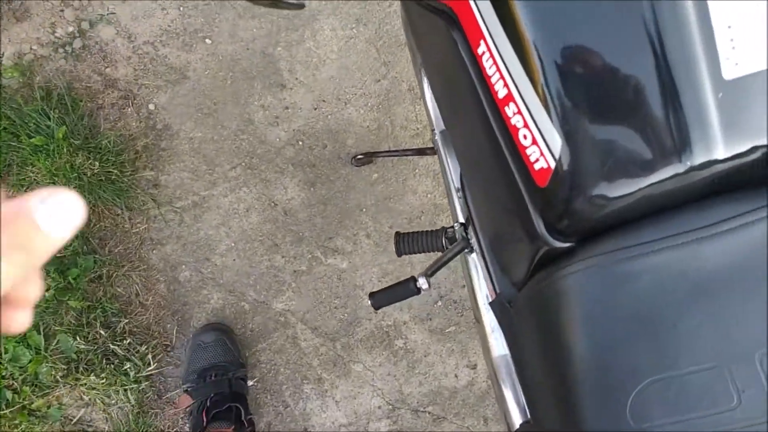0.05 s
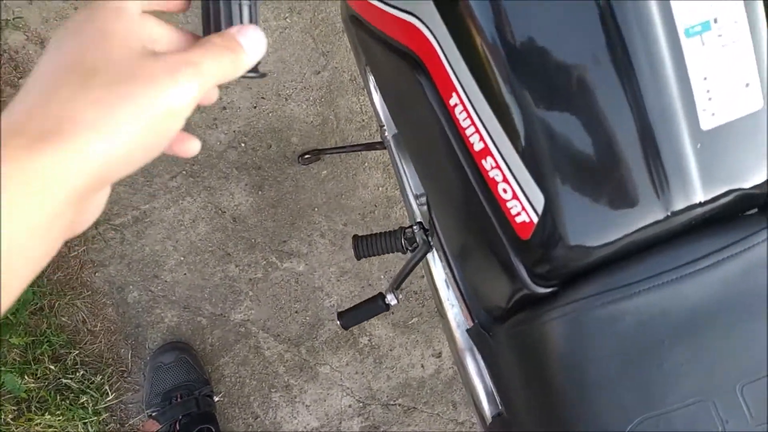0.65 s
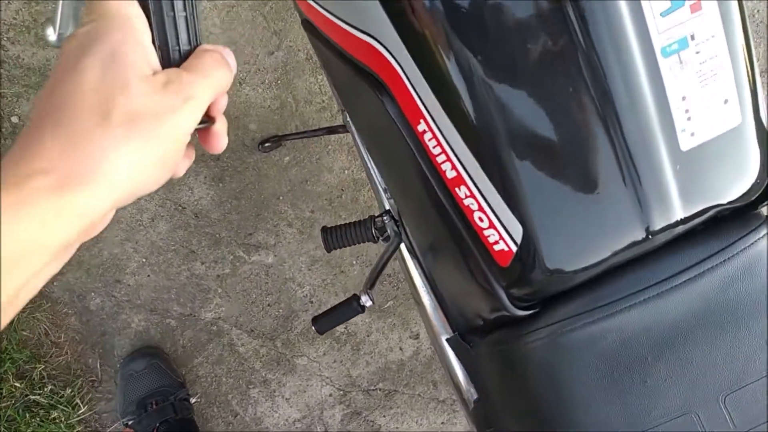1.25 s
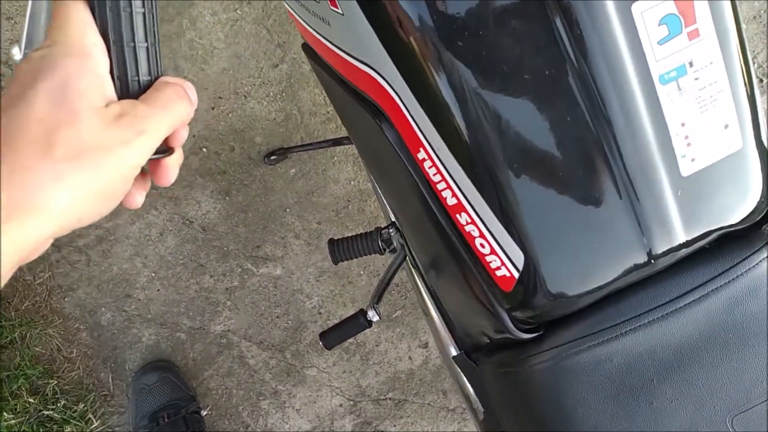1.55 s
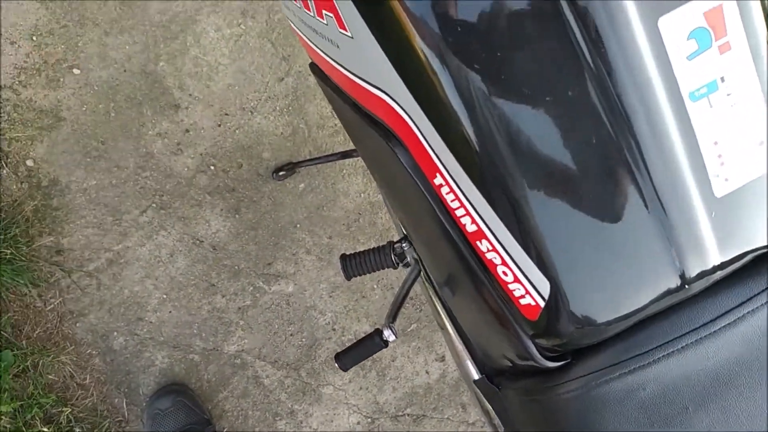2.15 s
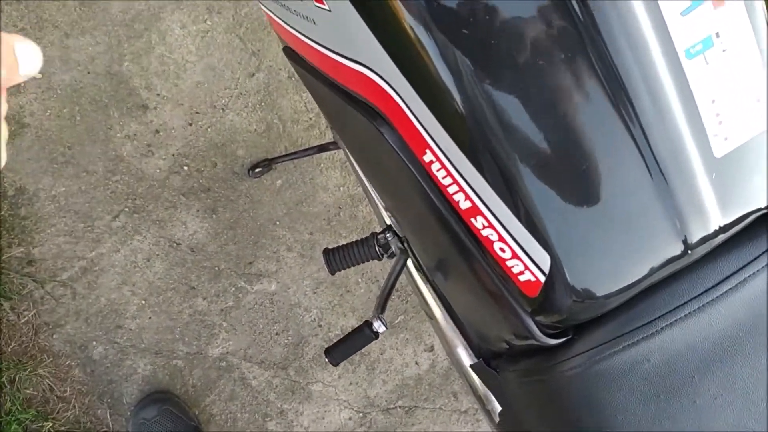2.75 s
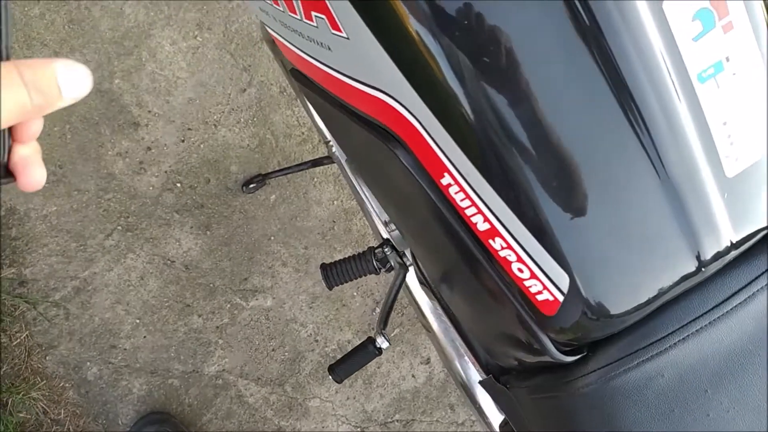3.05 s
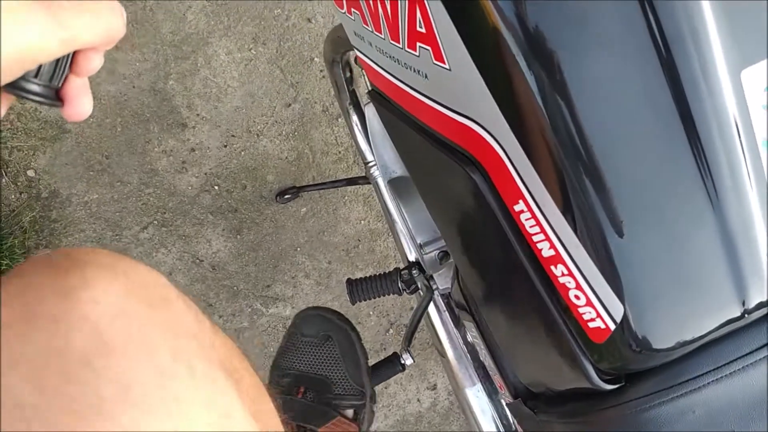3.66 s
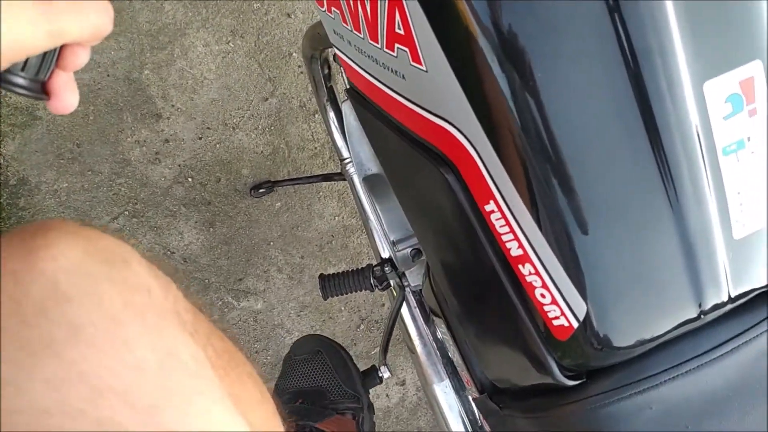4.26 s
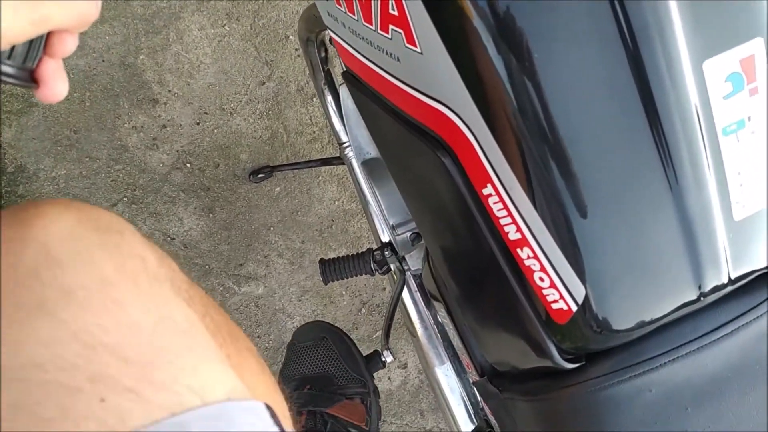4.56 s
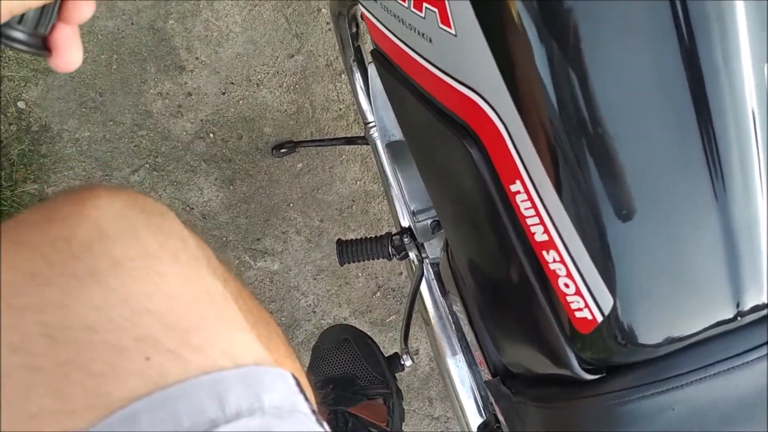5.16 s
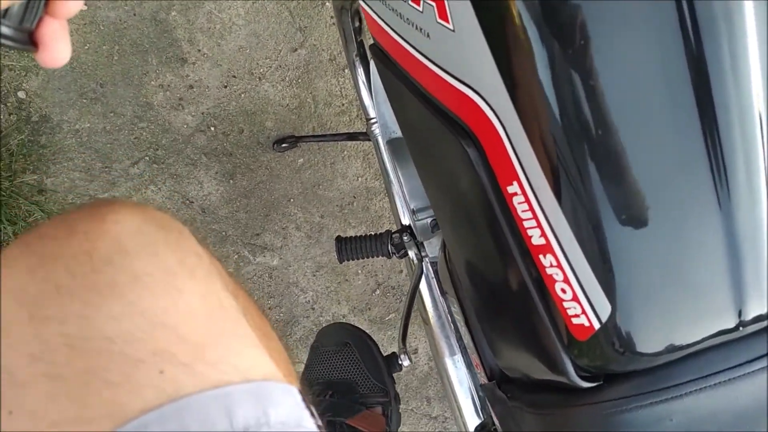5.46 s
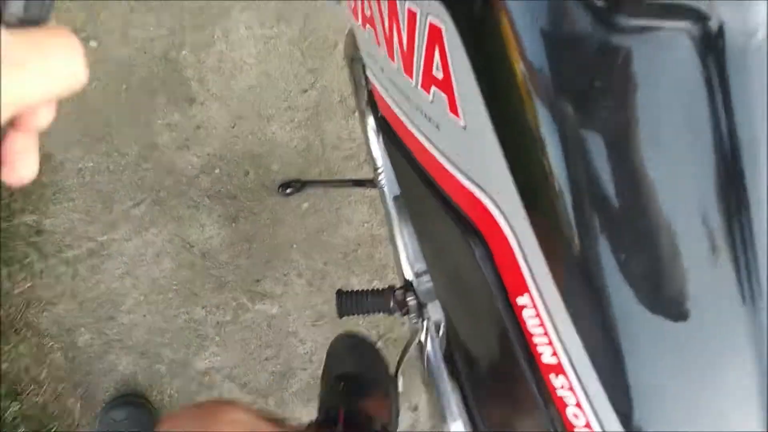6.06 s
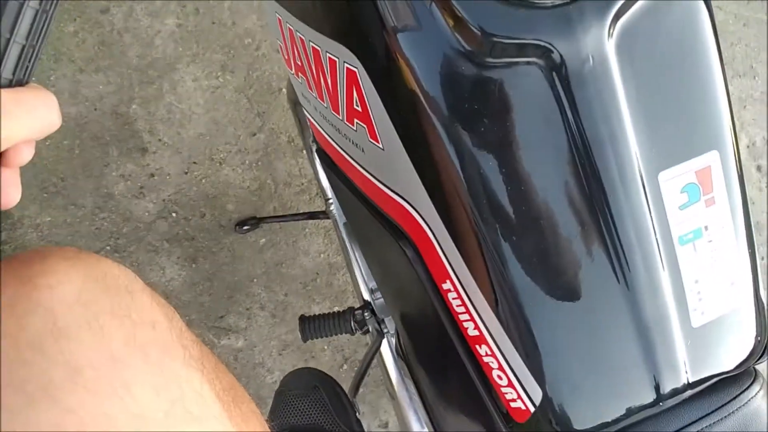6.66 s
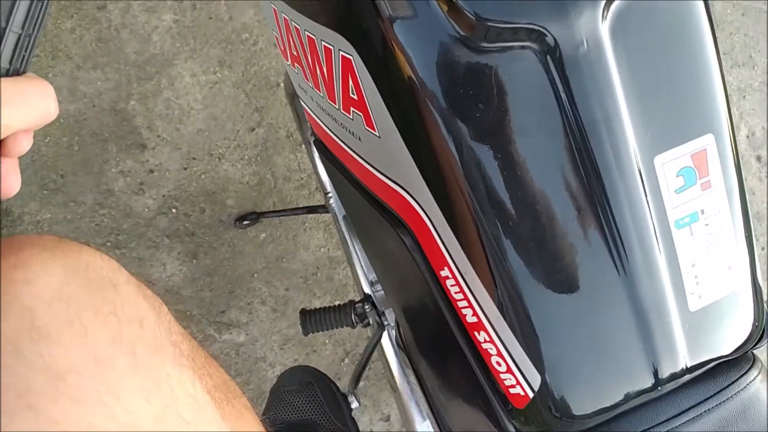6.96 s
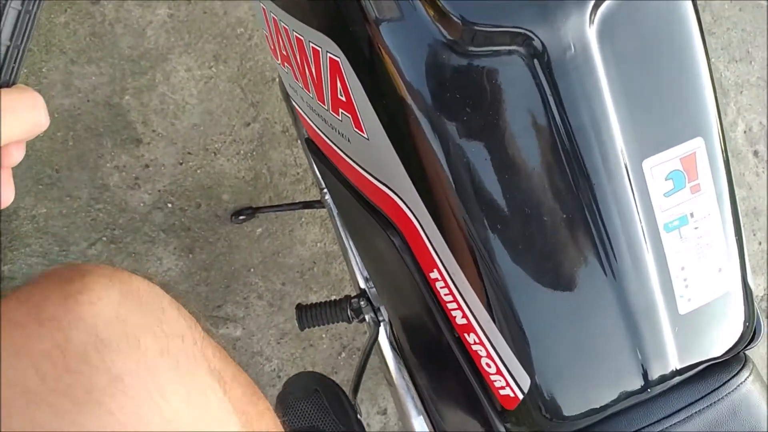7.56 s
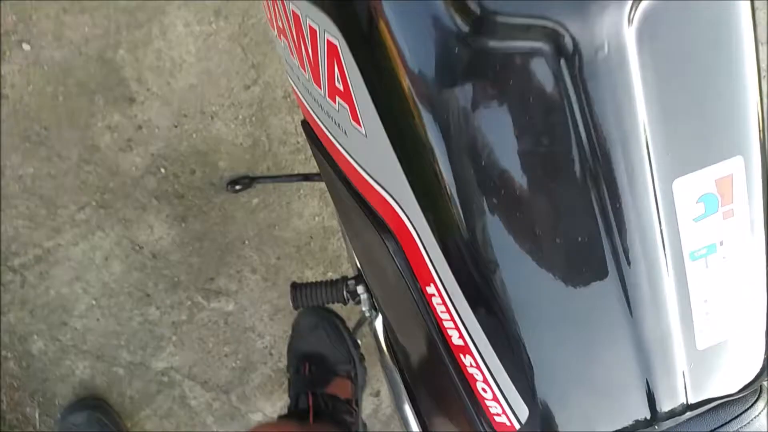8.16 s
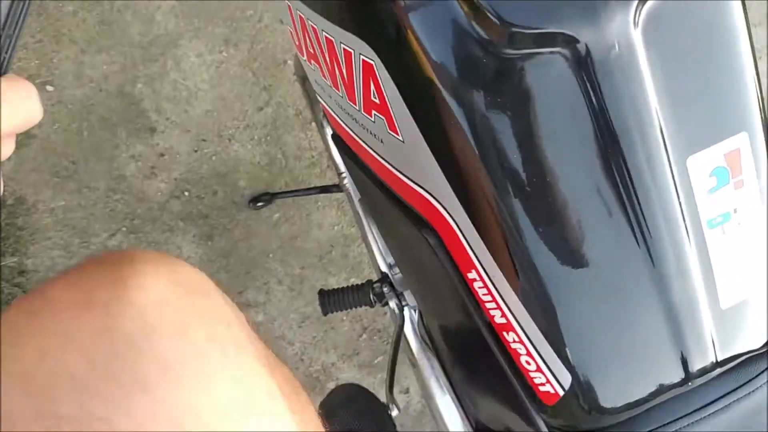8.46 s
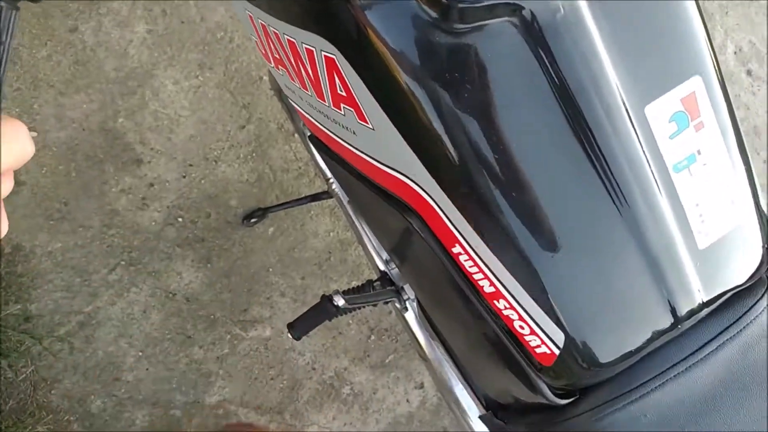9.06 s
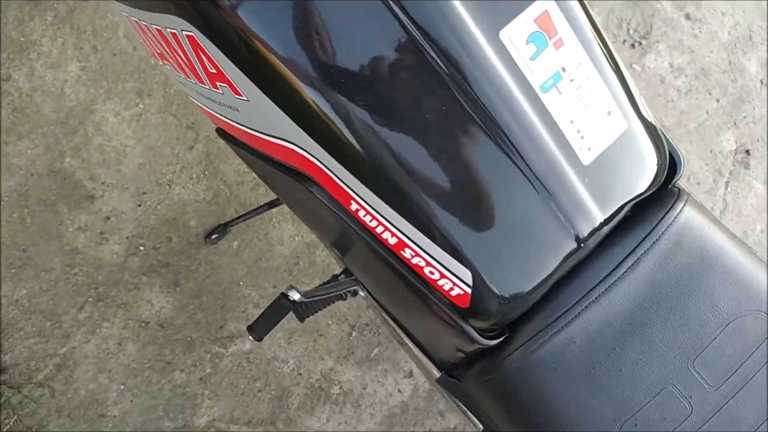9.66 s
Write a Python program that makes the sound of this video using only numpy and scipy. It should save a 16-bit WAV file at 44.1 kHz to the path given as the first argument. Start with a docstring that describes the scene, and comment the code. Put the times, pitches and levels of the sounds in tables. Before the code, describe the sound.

Clothes rustle, a motorcycle kick lever clanks, one kick fails, and the second starts the two-stroke engine into an uneven, popping idle.

```python
"""A two-stroke twin engine is kick-started on a concrete yard.
First the rider's clothes rustle and his shoe scuffs, while a bird calls in the distance.
The kick lever clanks into its gears; one kick only spins the engine, the second one starts it.
It idles unevenly: a few hard firings pop out of the pipe, with separate soft puffs between them,
while gears and pistons clatter and set the metal case ringing."""
import sys
import numpy as np
from scipy import signal
from scipy.fft import rfft, irfft, next_fast_len
from scipy.io import wavfile
from scipy.ndimage import uniform_filter1d

SR = 44100
rng = np.random.default_rng(int(sys.argv[2]) if len(sys.argv) > 2 else 0)


def bounce(signal):
    """Save signal as a 16-bit WAV file at the path given by the first command-line argument."""
    frames = np.transpose(np.atleast_2d(signal))
    limited = np.clip(frames, -1, 1)
    pcm = np.round(limited * 32767).astype(np.int16)
    wavfile.write(sys.argv[1], SR, pcm)


N = 432621
T = np.arange(N) / SR
TAIL = 32768  # samples given to a sound that dies away


def undb(db):
    """Turn decibels into a gain to multiply by."""
    return 10 ** (np.asarray(db) / 20)


def unit(x):
    """Scale a sound to an average (rms) level of 1."""
    return x / np.sqrt(np.mean(x ** 2))


def unit_energy(h):
    """Scale a stereo echo to an energy of 1 per side, on average."""
    return h / np.sqrt(np.sum(h ** 2) / 2)


def along(points, hz):
    """Read between (frequency, value) points, giving every octave equal room."""
    f, value = np.transpose(points)
    return np.interp(np.log(np.maximum(hz, 1)), np.log(f), value)


def response(colour, size=4096):
    """The sound of one tap on something with this tone colour, with energy 1."""
    cepstrum = irfft(np.log(undb(along(colour, np.fft.rfftfreq(size, 1 / SR)))))
    # fold it so that nothing sounds before the tap
    cepstrum[1:size // 2] *= 2
    cepstrum[size // 2 + 1:] = 0
    h = irfft(np.exp(rfft(cepstrum)))
    return h / np.sqrt(np.sum(h ** 2))


def ring(x, h):
    """Let every sample of x set off a copy of h (convolution)."""
    return signal.oaconvolve(np.atleast_2d(x), np.atleast_2d(h), axes=1)[:, :N]


# how alike left and right sound: (frequency [Hz], likeness [0-1])
LIKENESS = [(100, 0.52), (280, .92), (600, 0.05), (1500, 0.1), (8000, 0.14)]

def noise(colour):
    """Stereo noise with this tone colour; the bass is much alike on both sides."""
    hz = np.fft.rfftfreq(N, 1 / SR)
    alike = np.clip(along(LIKENESS, hz), 0, 1)
    mid, side = rfft(rng.standard_normal((2, N)))
    mid, side = mid * np.sqrt(1 + alike), side * np.sqrt(1 - alike)
    return unit(irfft(np.array([mid + side, mid - side]) * undb(along(colour, hz)), N))


def wander(per_s):
    """A random curve, mostly within -1 to 1, with per_s new values a second."""
    return np.interp(T * per_s, np.arange(16384), 1.2 * rng.standard_normal(16384))


def pulses(times, sizes):
    """One single-sample spike at each time."""
    return np.bincount(np.maximum(np.asarray(times) * SR, 0).astype(int), sizes, N)[:N]


def chance_pulses(per_s, spread_db, limit):
    """Spikes at random times; their levels stray from 0 dB by up to limit * spread_db."""
    happens = rng.random(N) < per_s / SR
    return happens * undb(spread_db * np.minimum(rng.exponential(size=N), limit))


def fade(t60, size=TAIL):
    """Die away from 1, falling 60 dB in t60 seconds."""
    return np.exp(-np.log(1000) * T[:size] / t60)


def bursts(times, db, t60, tail_db, tail_t60, rise_s=0.0024):
    """Loudness curve of blows: a quick rise, then a fall with a weaker tail."""
    fall = fade(t60) + undb(tail_db) * fade(tail_t60)
    rise = 1 - fade(rise_s + 1 / SR)
    return ring(pulses(times, undb(db)), fall * rise)


def arches(rows, power=0.3):
    """Loudness curve of sounds that swell and sink; a small power makes the ends abrupt."""
    gain = np.zeros(N)
    for start, length_s, db in rows:
        inside = (T > start) & (T < start + length_s)
        gain[inside] += undb(db) * np.abs(np.sin(np.pi * (T[inside] - start) / length_s)) ** power
    return gain


def add_tuned_burst(out, time, envelope, hz, spread):
    """Mix in a short burst of noise centred on one pitch."""
    edges = np.clip([hz / (1 + spread), hz * (1 + spread)], 20, SR / 3)
    bandpass = signal.butter(2, edges, "band", fs=SR, output="sos")
    burst = unit(signal.sosfilt(bandpass, rng.standard_normal((2, len(envelope))))) * envelope
    start = int(time * SR)
    out[:, start:start + len(envelope)] += burst[:, :N - start]


def metal_ring(notes, spread=0.012, count=3):
    """Struck metal: each note is a cluster of close tones that die away."""
    tones = 0
    for hz, db, t60 in notes * count:
        detuned = hz * (1 + spread * rng.uniform(-1, 1))
        cycles = detuned * T[:TAIL] + rng.random((2, 1))
        tones += undb(db) * fade(t60) * np.sin(2 * np.pi * cycles)
    return unit_energy(tones)


# tone colour of the outdoor air: (frequency [Hz], level [dB])
AIR_COLOUR = [(20, 1), (35, -4.5), (120, -15), (185, -7), (250, -14.5), (400, -16.5), (900, -26),
              (1400, -30), (2000, -29.5), (4000, -35.5), (7000, -37), (9500, -31), (11500, -44.5),
              (15000, -65.5)]

def outdoor_air(level_db=-61.5):
    """A quiet, low rush that wavers a little."""
    return noise(AIR_COLOUR) * undb(level_db + wander(2))


# a sleeve, hand or sole rubs, or the ratchet scrapes briefly during the kick: (time [s], length [s], level
# [dB])
RUBS = [(1.0, 0.37, -68), (1.44, 0.58, -57), (2.385, 0.2, -61), (2.76, 1.03, -62), (3.152, 0.27, -60.5),
        (4.046, .14, -68.5), (5.63, 0.18, -57.5), (6.188, 0.024, -44), (6.246, 0.036, -44.5),
        (6.386, 0.03, -50), (7.242, 0.29, -66.5)]
# sharp ticks of grip and grit: (time [s], level [dB])
TICKS = [(.1994, -58), (1.016, -48.5), (1.05, -49), (1.109, -43), (1.158, -39), (1.201, -47),
         (1.285, -48.5), (1.3847, -34), (1.511, -44.5), (1.678, -52), (1.83, -34.5), (1.9466, -62),
         (2.027, -45), (2.39, -43.5), (2.487, -45), (2.597, -49), (2.775, -44), (2.878, -45), (2.96, -47),
         (3.021, -47), (4.6964, -53.5)]
# tone colour of rubs and ticks: (frequency [Hz], level [dB])
CLOTH_COLOUR = [(200, -5), (500, -6), (2200, -1), (3300, -6), (5000, -3.5), (7000, -2.5), (9000, 3),
                (10500, -3.5), (12000, -13.5), (15000, -17.5)]

def cloth_and_grip():
    """Cloth rustles and the ratchet scrapes briefly, with chance ticks while it rubs; the grip and grit tick
    sharply."""
    rubbing = arches(RUBS, power=0.55)
    rustle = noise(CLOTH_COLOUR) * rubbing * undb(2 * wander(70) + 1.4 * wander(900))
    grit = noise(CLOTH_COLOUR) * ring(chance_pulses(38, spread_db=5, limit=2) * rubbing, fade(0.009))
    times, db = np.transpose(TICKS)
    ticks = noise(CLOTH_COLOUR) * bursts(times, db - 6.5, t60=0.016, tail_db=-4, tail_t60=0.092)
    return rustle + grit + ticks


# bird calls: (time [s], starting pitch [Hz], level [dB])
CHIRPS = [(.376, 4730, -68.5), (4.287, 4690, -58.5), (6.902, 4550, -63.5)]

def bird(length_s=0.13, fall_per_s=3.9, lower_voice=0.8, rasp_hz=800):
    """A raspy two-voiced note that slides down, smeared by distance."""
    calls = np.zeros(N)
    for start, hz, db in CHIRPS:
        age = np.clip(T - start, 0, length_s)
        phase = 2 * np.pi * np.cumsum(hz * np.exp(-fall_per_s * age)) / SR
        swell = np.sqrt(np.abs(np.sin(np.pi * age / length_s)))
        calls += undb(db - 1.5) * swell * (np.sin(phase) + 0.56 * np.sin(lower_voice * phase))
    rasp = unit(uniform_filter1d(rng.standard_normal(N), int(SR / rasp_hz)))
    smear = unit_energy(rng.standard_normal((2, TAIL)) * fade(0.031))
    return ring(calls * rasp, smear)


# the sole scrapes on the ground or lever: (time [s], length [s], level [dB])
SCRAPES = [(.755, 0.077, -70), (.855, .024, -69)]
# the shoe lands on concrete or rubber: (time [s], level [dB], extra for the scuff [dB])
STEPS = [(1.365, -49, -2), (1.691, -37.5, -18), (1.796, -32, -11), (2.388, -60, 15), (2.884, -52, 8.5),
         (3.728, -36, -23), (4.266, -30, -36)]
# tone colour of the sole landing: (frequency [Hz], level [dB])
SOLE_COLOUR = [(60, -27), (260, 7), (500, -2.5), (1000, -5.5), (2200, -48), (4000, -39), (12000, -54)]
# tone colour of the sole sliding: (frequency [Hz], level [dB])
SCUFF_COLOUR = [(200, -36.5), (600, -6.5), (1150, -0.5), (1600, -2.5), (2200, 0.5), (3200, -16.5),
                (10000, -27)]

def shoe():
    """The shoe scrapes, lands softly and scuffs."""
    scrapes = noise(SCUFF_COLOUR) * arches(SCRAPES) * undb(5.7 * wander(130))
    times, db, scuff_db = np.transpose(STEPS)
    landing = bursts(times, db - 14, t60=0.094, tail_db=-10.5, tail_t60=0.33, rise_s=0.018)
    sliding = bursts(times, db + scuff_db - 5, t60=0.1, tail_db=-25, tail_t60=0.46, rise_s=0.011)
    return scrapes + noise(SOLE_COLOUR) * landing + noise(SCUFF_COLOUR) * sliding


# thin high notes: (time [s], length [s], level [dB])
WHISTLES = [(.94, .075, -62.5), (1.185, .069, -63), (1.62, 0.095, -62), (5.0, 0.19, -66),
            (5.582, 0.066, -64.5), (7.28, 0.1, -67)]
# their tone colour: (frequency [Hz], level [dB])
WHISTLE_COLOUR = [(6200, -25), (6800, -1), (7020, -9), (7350, -12), (7900, -17), (8600, -31)]

def whistles():
    """Thin, breathy high notes, like a small bird far off."""
    return noise(WHISTLE_COLOUR) * arches(WHISTLES)


# the lever knocks into its gears and against its stop:
# (time [s], level [dB], extra for the thud [dB], extra for the snap [dB], pitch [Hz])
LEVER_KNOCKS = [(4.12, -39.5, -10, -25, 1370), (4.269, -51, 4.5, -38, 1200),
                (4.869, -23.5, -18, -17.5, 1900), (4.876, -15.5, -21, -28, 1970),
                (4.887, -18.5, -13.5, -26, 1974), (5.083, -51, 4, -16, 890), (7.227, -41, -4, -23, 1390),
                (7.278, -33, -10.5, -23, 1843), (7.505, -28.5, -13, -27, 1650),
                (7.575, -28.5, -6.5, -18, 1584), (7.959, -34, -10, -14.5, 1820)]
# notes the lever rings with: (pitch [Hz], level [dB], fade time [s])
LEVER_NOTES = [(469, -4.5, .16), (1145, -6.5, .14), (1308, -10, .12), (1461, 0, .1), (1704, 8, 0.11),
               (2010, -3.5, .1), (1980, 8.5, 0.13), (2235, 1, .17), (2470, -1.5, .12)]
# tone colour of steel knocking on steel: (frequency [Hz], level [dB])
KNOCK_COLOUR = [(150, -21), (400, -10.5), (900, -2.5), (1450, 1), (2200, 5), (2900, -16), (4500, -18),
                (9500, -29), (14000, -61)]
# tone colour of the lever's snap: (frequency [Hz], level [dB])
SNAP_COLOUR = [(1000, -20.5), (2800, 1.5), (4400, 2.5), (6000, -5), (9200, -3.5), (10300, -14.5),
               (15000, -47.5)]

def kick_lever(bite_db=-6.5, ring_db=-18.5):
    """Each knock snaps, thuds and bites at its own pitch, waking its own mix of the lever's notes."""
    times, db, thud_db, snap_db, pitches = np.transpose(LEVER_KNOCKS)
    shape = (fade(0.039) + undb(-29.5) * fade(0.36)) * (1 - fade(0.004))
    bites = np.zeros((2, N))
    for start, gain, hz in zip(times, undb(db), pitches):
        add_tuned_burst(bites, start, gain * shape, hz, spread=0.25)
    knock = bursts(times, db - 7.5, t60=0.087, tail_db=-20, tail_t60=0.29, rise_s=0.015)
    snap = bursts(times, db + snap_db + 5.5, t60=0.099, tail_db=-32.5, tail_t60=1, rise_s=0.0035)
    contact = noise(KNOCK_COLOUR) * knock + noise(SNAP_COLOUR) * snap
    ringing = ring(bites, metal_ring(LEVER_NOTES))
    return undb(bite_db) * bites + undb(ring_db) * ringing + contact + frame_thud(times, db + thud_db)


# tone colour of a thump in the frame: (frequency [Hz], level [dB])
THUMP_COLOUR = [(40, -27), (120, -9.5), (240, -3), (400, -12.5), (700, -16.5), (2000, -67.5)]
# tone colour of the tank and frame booming: (frequency [Hz], level [dB])
BOOM_COLOUR = [(45, -17.5), (90, -6.5), (138, 4.5), (185, -1.5), (240, 13), (290, -9), (420, -14),
               (1200, -49.5)]

def frame_thud(times, db, boom_lag_s=0.018):
    """A blow thumps the frame; tank and frame boom just after it."""
    thump = bursts(times, db - 3.5, t60=0.085, tail_db=-6.5, tail_t60=0.35, rise_s=0.019)
    boom = bursts(times + boom_lag_s, db - 11, t60=0.45, tail_db=-17.5, tail_t60=0.28, rise_s=0.056)
    return noise(THUMP_COLOUR) * thump + noise(BOOM_COLOUR) * boom


# ratchet and gear teeth strike:
# (time [s], level [dB], extra for the thud [dB], extra for the crack [dB])
CLANKS = [(5.775, -55.5, 13.5, -10), (5.831, -30, 0, -19), (5.9, -8, -24, -6.5), (5.942, -14.5, -31, -43),
          (6.108, -22, -1.5, -16), (6.126, -28, -5.5, -12), (6.144, -30, -26, -15), (8.05, -24, -10, -17),
          (8.097, -11, -9, -3), (8.142, -14, -10.5, -15.5), (8.439, -14.5, 0, -24), (8.652, -21, -3, -34),
          (8.835, -22.5, 5, -32), (9.099, -26, 0, -10), (9.378, -28, -9, -5)]
# notes the engine case rings with: (pitch [Hz], level [dB], fade time [s])
CASE_NOTES = [(659, -4.5, .1), (984, -3.5, .14), (1327, -6, .2), (1454, -1, 0.16), (1719, -1.5, .11),
              (1834, -2.5, .12), (1986, -4.5, 0.18), (2124, -4, .14), (2400, -2, .18), (2640, -3.5, 0.14),
              (4500, -15.5, 0.13)]
# tone colour of a sharp crack of steel: (frequency [Hz], level [dB])
CRACK_COLOUR = [(1000, -23.5), (2800, -6), (4400, 2.5), (5600, -7), (8300, -3.5), (10000, -9.5),
                (12000, -24.5), (15000, -34.5)]

def gear_clanks():
    """Steel teeth strike: a crack, a knock that rings the case, and a thud through the frame."""
    times, db, thud_db, crack_db = np.transpose(CLANKS)
    knock = noise(KNOCK_COLOUR)
    knock *= bursts(times, db - 4.5, t60=0.04, tail_db=-16, tail_t60=0.3, rise_s=0.006)
    crack = noise(CRACK_COLOUR)
    crack *= bursts(times, db + crack_db + 4, t60=0.069, tail_db=-28, tail_t60=0.72, rise_s=0.0035)
    ring_db = db - 6 + 0.42 * (db - db.max())  # light blows hardly ring
    push = rng.standard_normal(N) * bursts(times, ring_db, t60=0.086, tail_db=-34, tail_t60=0.62)
    blow = knock + cooling_fins(crack) + frame_thud(times, db + thud_db)
    return blow + ring(push, metal_ring(CASE_NOTES))


def cooling_fins(x, share=0.65, above_hz=2600, t60=0.04):
    """The engine's thin fins add a short, ever shifting ring to the treble."""
    echoes = rng.standard_normal((2, 2, 4096)) * fade(t60, size=4096)
    treble = signal.sosfilt(signal.butter(2, above_hz, "high", fs=SR, output="sos"), x)
    body = signal.sosfilt(signal.butter(2, above_hz, "low", fs=SR, output="sos"), x)
    one, other = (ring(treble, unit_energy(echo)) for echo in echoes)
    blend = np.pi / 2 * wander(10)
    return body + share * (np.cos(blend) * one + np.sin(blend) * other - treble)


# kicks on the lever: (time of full speed [s], free spin [s], level [dB])
KICKS = [(5.883, 0.059, 3), (8.084, 0.0046, 5)]

def kick_spin(push_db_per_s=201.5, coast_db_per_s=48):
    """Loudness of the kicks: the foot winds the engine up; squeezed air and friction slow it down."""
    gain = np.zeros(N)
    for time, free_s, db in KICKS:
        before_s = np.maximum(time - T, 0)
        after_s = np.maximum(T - time - free_s, 0)
        gain += undb(db - push_db_per_s * before_s - coast_db_per_s * after_s)
    return gain


# tone colour of the kicked gears: (frequency [Hz], level [dB])
RASP_COLOUR = [(150, -15), (280, 1), (480, -9), (700, -0.5), (950, 1.5), (1100, -5.5), (1500, -8.5),
               (2200, -3.5), (3100, -8), (6000, -9.5), (9000, -7.5), (11500, -21.5), (15000, -30.5)]

def cranking():
    """The kicked gears rasp in uneven lumps, ring the case and shake the frame."""
    kicked = kick_spin() * compression()
    load = kicked * undb(-38 + 3 * wander(110) + 1.5 * wander(600))
    ringing = ring(rng.standard_normal(N) * load * undb(-7), metal_ring(CASE_NOTES))
    rasp = noise(RASP_COLOUR) * load
    rumble = noise(THUMP_COLOUR) * kicked * undb(-34)
    return rasp + ringing + rumble


# pistons pump without firing:
# (time [s], chuff level [dB], swell time [s], clink level [dB], chuff pitch [Hz])
UNFIRED_STROKES = [(5.868, -32, 0.0062, -40.5, 400), (5.923, -30, 0.0082, -24, 645),
                   (5.964, -47, .01, -45, 604), (6.011, -46, 0.0082, -30, 650),
                   (6.062, -35, 0.02, -30, 510), (6.139, -37, 0.0053, -36, 480),
                   (6.221, -39.5, 0.01, -43.5, 880), (6.26, -42, 0.0064, -65, 720),
                   (6.351, -42, 0.018, -59, 480), (6.39, -53, 0.01, -50.5, 470),
                   (6.485, -41.5, 0.012, -46, 603), (6.553, -47, 0.0091, -55.5, 780),
                   (6.63, -46, 0.014, -55.5, 470), (6.695, -49, .009, -51, 477),
                   (6.785, -51.5, 0.018, -61, 577), (6.845, -57, 0.014, -61.5, 445),
                   (8.074, -42, .0091, -28, 500), (8.135, -27.5, 0.008, -26, 493)]
# tone colour of a gulp of air: (frequency [Hz], level [dB])
GULP_COLOUR = [(20, -16), (40, -14.5), (68, 5), (100, -1.5), (240, -7.5), (400, -22.5), (1200, -47)]
# tone colour of a hollow chuff or bark: (frequency [Hz], level [dB])
HOLLOW_COLOUR = [(200, -2), (320, 7), (455, 5.5), (540, -2), (665, 6), (800, -7), (965, -2), (1100, -22),
                 (3000, -32)]
# tone colour of a gear's clink: (frequency [Hz], level [dB])
CLINK_COLOUR = [(1200, -11), (1700, -4), (2100, 1.5), (2900, -6), (3300, -13), (9000, -29.5), (12000, -34)]

def pumping(note_db=-3, air_db=-4):
    """Each unfired stroke gives a deep gulp that fades with the spin, a hollow chuff and a clink."""
    flow, notes = np.zeros(N), np.zeros((2, N))
    for time, db, swell_s, _, hz in UNFIRED_STROKES:
        age = T[:TAIL] / swell_s
        puff = undb(db) * age * np.exp(1 - age)
        start = int(time * SR)
        flow[start:start + TAIL] += puff
        add_tuned_burst(notes, time, puff, hz, spread=0.17)
    times, _, _, clink_db, _ = np.transpose(UNFIRED_STROKES)
    clinks = noise(CLINK_COLOUR)
    clinks *= bursts(times, clink_db, t60=0.15, tail_db=-19, tail_t60=0.22, rise_s=0.009)
    gulp = response(GULP_COLOUR)
    gulp_sizes = undb(-21.5) * np.interp(times, T, kick_spin())
    gulps = ring(pulses(times, gulp_sizes), gulp / np.abs(gulp).max())
    chuffs = undb(air_db) * noise(HOLLOW_COLOUR) * flow + undb(note_db) * notes
    return gulps + chuffs + clinks


def compression(boost_db=1, lag_s=0.011, width_s=0.015):
    """The cranking gets a little louder each time a piston squeezes air without firing."""
    gap_s = np.min([np.abs(T - row[0] - lag_s) for row in UNFIRED_STROKES], axis=0)
    return undb(boost_db * np.exp(-(gap_s / width_s) ** 2))


RUN_FROM_S, RUN_TO_S = 8.06, 9.882  # the engine runs under its own power

def running(onset_s=0.21, settle_db_per_s=1.5):
    """Loudness of the engine: it comes up as it catches, then slowly settles."""
    age = T - RUN_FROM_S
    return np.clip(age / onset_s, 0, 1) * undb(-settle_db_per_s * (age - age[-1] / 2))


def pressure(build_s=0.3, build_db=9):
    """Loudness of the exhaust: it builds up over the first strokes."""
    return running() * undb(-build_db * np.clip(1 - (T - RUN_FROM_S) / build_s, 0, 1))


# strokes that fire hard: (time [s], pop level [dB], spit level [dB], bark level [dB])
FIRINGS = [(8.192, -17, -55, -33), (8.276, -8.5, -55, -24), (8.308, -3.5, -26, -29),
           (8.342, -7.5, -43, -42), (8.369, -18, -48, -24.5), (8.423, -11, -36, -34),
           (8.473, -15.5, -47, -34), (8.498, -13, -52, -35), (8.521, -22, -52, -43),
           (8.575, -3.5, -29, -23), (8.602, -12.5, -32, -29.5), (8.70, -32, -31.5, -50),
           (8.782, -21, -38, -48), (8.839, -4, -25, -27), (8.918, -4, -29, -22.5), (9.071, -37, -53, -28.5),
           (9.101, -7.5, -18.5, -37), (9.243, -4, -24.5, -20), (9.299, -34, -30.5, -55),
           (9.385, -5.5, -21.5, -23.5), (9.591, -2.5, -30, -18), (9.619, -11, -26.5, -32)]
# tone colour of a soft puff from the pipe: (frequency [Hz], level [dB])
PUFF_COLOUR = [(45, -56.5), (62, 1), (98, 0.5), (135, 3), (180, 0), (235, 10), (290, -11.5), (370, -4.5),
               (450, -19.5), (680, -21), (1500, -56.5)]
# tone colour of a hard pop: (frequency [Hz], level [dB])
POP_COLOUR = [(40, -20), (62, 1), (130, 2), (175, 12), (215, 3.5), (270, 14.5), (335, 4), (450, -11),
              (680, -5.5), (1100, -16.5), (2500, -14.5), (8000, -59)]
# tone colour of spitting gas: (frequency [Hz], level [dB])
SPIT_COLOUR = [(400, -23), (2000, 3.5), (3200, -22), (6500, -10.5), (8800, 2.5), (10000, -1), (12000, -16),
               (15000, -19)]
STROKE_HZ = 36  # rough number of piston strokes a second

def exhaust(strokes, scatter_db=1.8):
    """Every stroke sends one puff down the pipe; a hard firing pops, spits gas and barks."""
    puffs = through_pipe(strokes, scatter_db * rng.standard_normal(len(strokes)))
    idle = ring(puffs * pressure(), response(PUFF_COLOUR)) * np.sqrt(SR / STROKE_HZ) * undb(-25.5)
    times, pop_db, spit_db, bark_db = np.transpose(FIRINGS)
    pop = response(POP_COLOUR)
    pops = ring(through_pipe(times, pop_db - 1), pop / np.abs(pop).max())
    spit = noise(SPIT_COLOUR)
    spit *= bursts(times - 0.003, spit_db + 3.5, t60=0.038, tail_db=-8.5, tail_t60=0.12, rise_s=0.0043)
    bark = noise(HOLLOW_COLOUR) * bursts(times, bark_db, t60=0.22, tail_db=-33, tail_t60=0.31)
    return idle + pops + cooling_fins(spit) + bark


def through_pipe(times, db, trip_s=0.0073, louder_db=3.5):
    """A puff is heard as it enters the pipe, then flipped and louder as it comes out."""
    return pulses(times, undb(db - louder_db)) - pulses(times + trip_s, undb(db))


def stroke_times(slowing=0.028):
    """Each hard firing speeds the engine up; every stroke after it takes a little longer."""
    marks = [RUN_FROM_S] + [row[0] for row in FIRINGS] + [RUN_TO_S]
    times = []
    for start, end in zip(marks, marks[1:]):
        count = max(1, round((end - start) * STROKE_HZ))
        periods = (1 + slowing) ** np.arange(count)
        times += list(start + (end - start) * (np.cumsum(periods) - periods) / periods.sum())
    return np.array(times)


# tone colour of the running gears: (frequency [Hz], level [dB])
CLATTER_COLOUR = [(200, -22), (480, -5), (700, 1), (980, 3), (1130, -4.5), (1350, 1.5), (1600, -9),
                  (2050, 1), (2600, -10), (3100, -11), (6000, -13.5), (9000, -6), (11500, -20),
                  (14200, -20), (15500, -36.5)]
# loose steel jangles as the engine flares up: (time [s], length [s], level [dB])
JANGLES = [(8.436, 0.027, -28), (8.476, 0.015, -26.5)]
# tone colour of the loose steel: (frequency [Hz], level [dB])
JANGLE_COLOUR = [(1500, -15), (3300, -8), (4160, 5), (4700, -15), (6150, 2), (7000, -20), (10500, -21),
                 (14000, -35)]

def clatter(strokes, clicks_per_s=100):
    """Gears, chain and pistons rattle, loose teeth and links click; the frame shakes once a stroke."""
    stroke_count = np.interp(T, strokes, np.arange(len(strokes)))
    beat = np.cos(2 * np.pi * (stroke_count - 0.28))
    load = gear_load() * undb(-1.5 * beat)
    rattle = noise(CLATTER_COLOUR) * load * undb(2 * wander(500) + 1.24 * wander(70) - 1.5)
    rattle = cooling_fins(rattle)
    ringing = gear_slack() * load * undb(-5.5)
    jangle = noise(JANGLE_COLOUR) * arches(JANGLES) * undb(2 * wander(270))
    shake = noise(THUMP_COLOUR) * undb(-25 + 4 * beat) * pressure()
    impacts = chance_pulses(clicks_per_s, spread_db=-5.5, limit=3) * load * undb(-14.5)
    clicks = noise(CRACK_COLOUR) * ring(impacts, fade(0.049))
    return rattle + ringing + jangle + shake + clicks


def gear_load(flare_db=6, flare_after_s=0.364, flare_width_s=0.05):
    """Loudness of the gears: raised by one early flare of speed and jolted by each hard firing."""
    flare = np.exp(-((T - RUN_FROM_S - flare_after_s) / flare_width_s) ** 2)
    times, pop_db, _, _ = np.transpose(FIRINGS)
    jolts = ring(pulses(times, undb(pop_db - 24)), fade(0.37))[0]
    return np.hypot(running() * undb(-30.5 + flare_db * flare), jolts)


def gear_slack(sharpness=22, waver_db=4.5):
    """Play between the teeth comes and goes, waking now one, now another note of the case."""
    ringing = np.zeros((2, N))
    for hz, db, _ in CASE_NOTES:
        b, a = signal.iirpeak(hz, sharpness, fs=SR)
        push = rng.standard_normal((2, N)) * undb(db + waver_db * wander(35))
        ringing += signal.lfilter(b, a, push)
    return unit(ringing)


def scene(echo_db=-12.5):
    """Engine and rider close by, echoing faintly off the yard's walls, with birds and quiet air."""
    strokes = stroke_times()
    engine = exhaust(strokes) + pumping() + cranking() + clatter(strokes)
    near = engine + kick_lever() + gear_clanks() + cloth_and_grip() + shoe()
    walls = unit_energy(rng.standard_normal((2, TAIL)) * (fade(0.48) - fade(0.0057)))
    return near + undb(echo_db) * ring(near, walls) + outdoor_air() + bird() + whistles()


# two microphones face different ways: (frequency [Hz], left minus right [dB])
BALANCE = [(60, 3.94), (200, 5.93), (400, 3.36), (700, 4.18), (1300, 7.69), (2200, 4.92), (4400, -1),
           (8500, -4.5), (14000, -1)]

def record(dry, left_lag_s=0.00012, ceiling=0.9, top_hz=15400):
    """Each side has its own tone and the left hears later; peaks are rounded, the top treble is cut."""
    size = next_fast_len(N + SR)
    hz = np.fft.rfftfreq(size, 1 / SR)
    lean = undb(along(BALANCE, hz) / 2)
    delay = np.exp(-2j * np.pi * hz * left_lag_s)
    heard = irfft(rfft(dry, size) * np.array([lean * delay, 1 / lean]), size)[:, :N]
    rounded = heard / (1 + (heard / ceiling) ** 4) ** 0.25
    return signal.sosfilt(signal.ellip(10, 0.2, 80, top_hz, fs=SR, output="sos"), rounded)


dry = scene()
out = record(dry)
bounce(out)
```